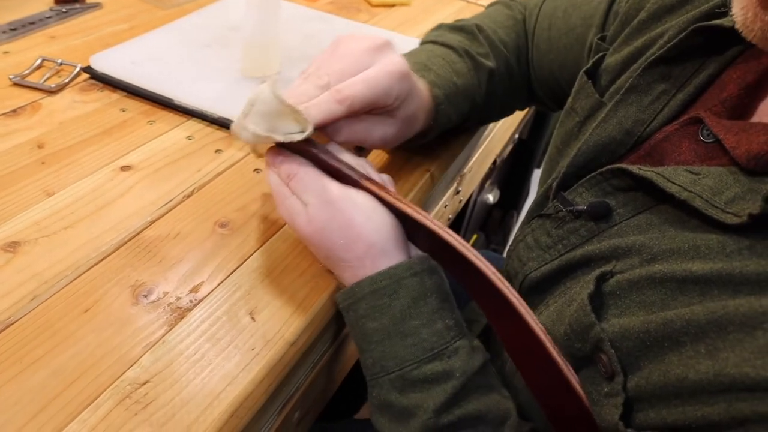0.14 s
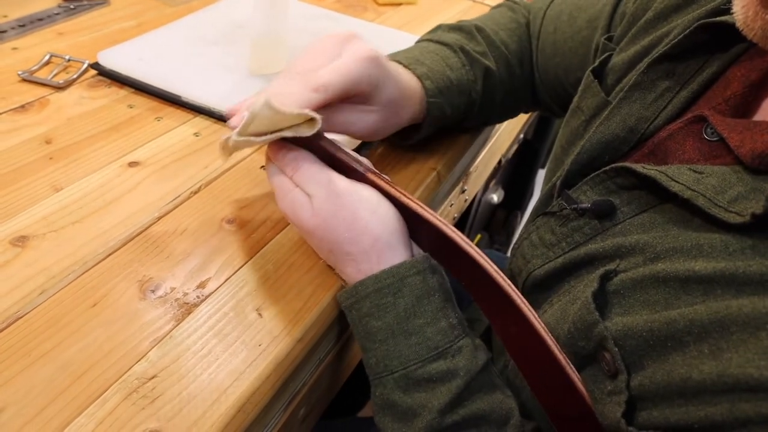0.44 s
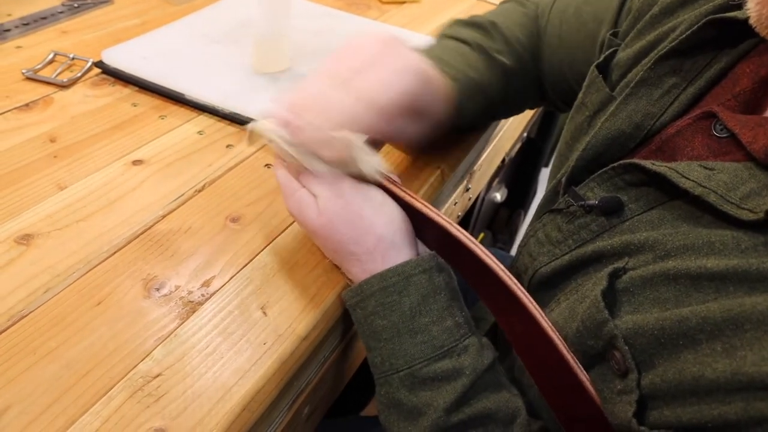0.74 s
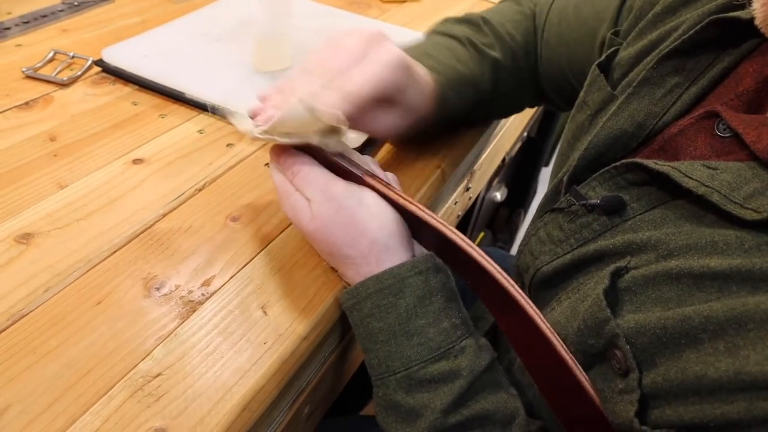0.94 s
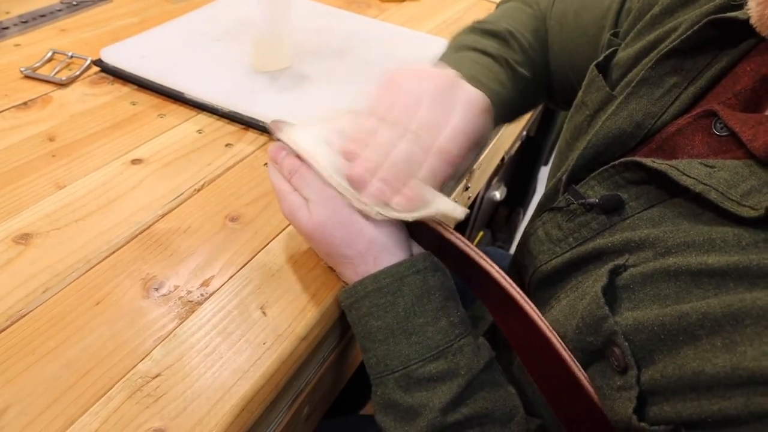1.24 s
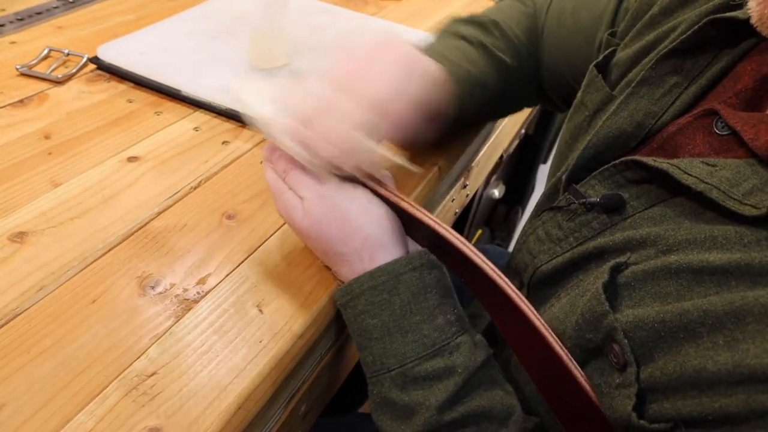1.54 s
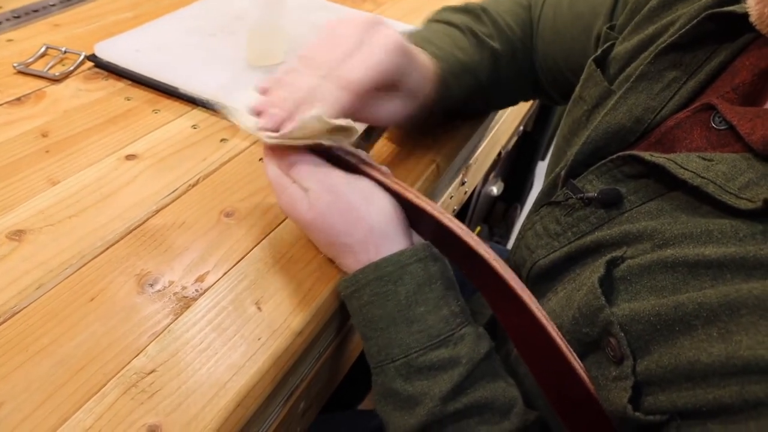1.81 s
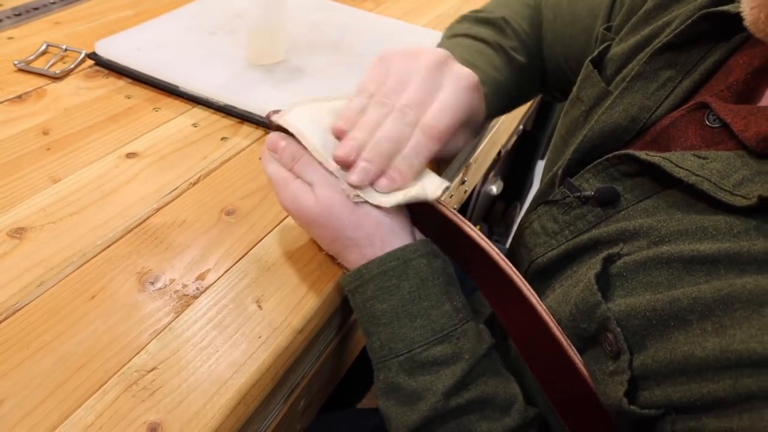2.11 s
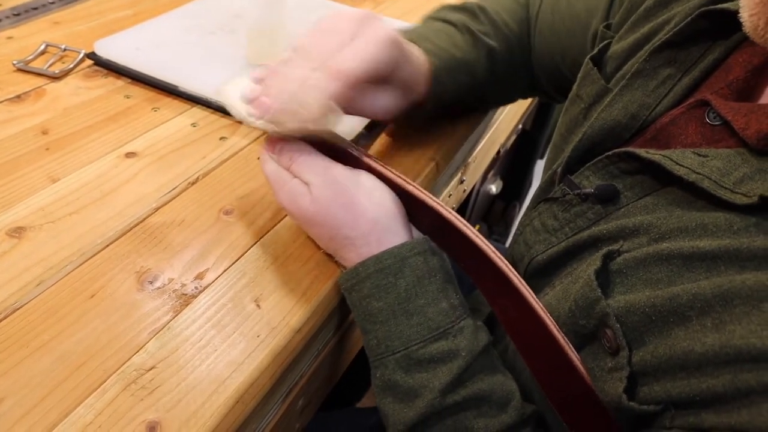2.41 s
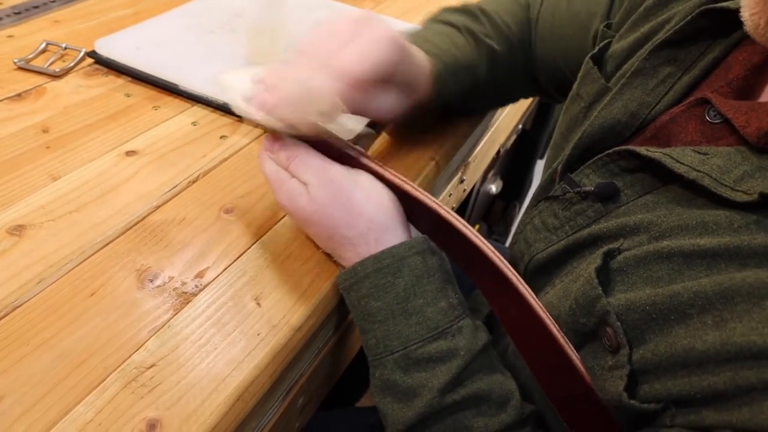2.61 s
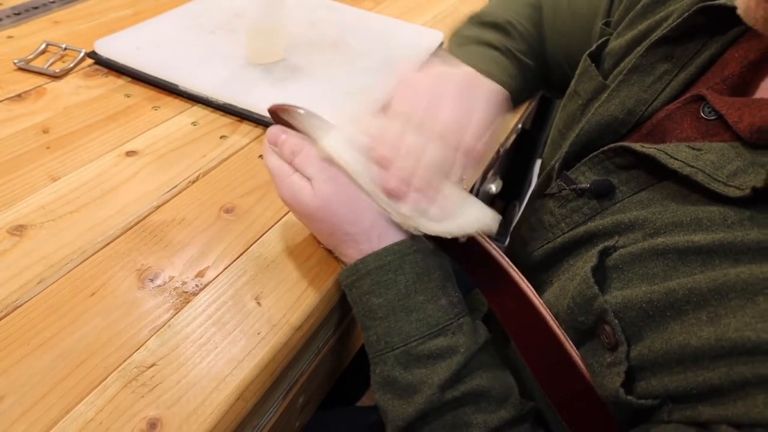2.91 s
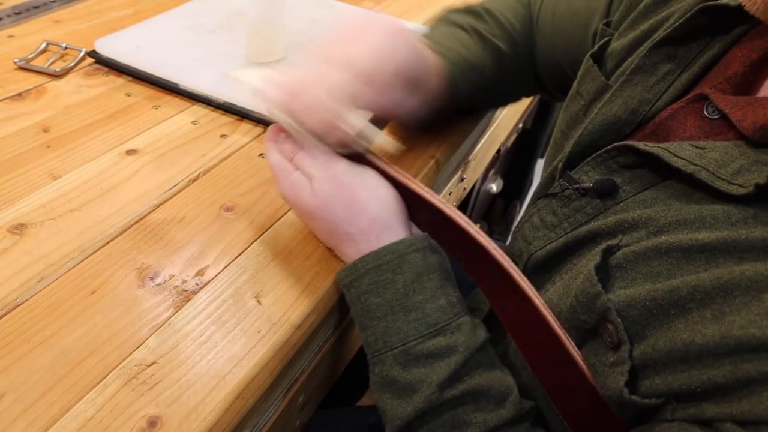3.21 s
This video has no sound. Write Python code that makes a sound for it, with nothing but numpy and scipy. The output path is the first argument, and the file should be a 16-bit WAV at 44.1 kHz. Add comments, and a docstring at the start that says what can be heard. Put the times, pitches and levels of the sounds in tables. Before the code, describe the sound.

A cloth rubs quickly back and forth along a leather strap edge, with one sharp early snap.

```python
"""A cloth is rubbed quickly to and fro along the edge of a leather strap at a wooden workbench.
Each stroke is shaped noise: hiss, rasp and dull drag where the press is hardest, and a rough weave note
that follows the hand's speed. A sharp snap (damped sines) follows two opening strokes; a faint one comes later.
Thuds are decaying sines; scuffs, catches, brushes, a squeak, a strap drone, rumble and sleeve rustle are noise.
All of it rings in a small workshop over a faint steady hiss."""
import sys
import numpy as np
from scipy import signal
from scipy.fft import rfft, irfft
from scipy.io import wavfile

SR = 44100
rng = np.random.default_rng(int(sys.argv[2]) if len(sys.argv) > 2 else 0)


def dump_mix(stems):
    """Bounce the given channels to the path in sys.argv[1] as a 16-bit WAV at rate SR."""
    frames = np.atleast_2d(stems).T  # one column per channel
    limited = np.clip(frames, -1, 1)  # hard clip at full scale
    pcm = np.round(limited * 32767).astype(np.int16)
    wavfile.write(sys.argv[1], SR, pcm)


N = 147735  # samples

# Strokes that bear down late. Each row: start in seconds, end in seconds, hiss level in dB, rasp level in dB,
# weave note level in dB, weave note near full speed in Hz.
PUSH_STROKES = [(-.06, 0.026, -25.5, -29.5, -37, 1400), (0.496, 0.612, -28.5, -29, -42, 1404),
                (0.761, .851, -25.5, -23.5, -32, 1300), (.991, 1.077, -24, -28.5, -33, 1350),
                (1.211, 1.294, -25, -34, -38, 1300), (1.429, 1.512, -25, -31.5, -35, 1400),
                (1.651, 1.727, -24, -33, -29, 1300), (1.857, 1.931, -25.7, -32, -35, 1000),
                (2.063, 2.142, -24.5, -30.5, -40, 1300), (2.277, 2.353, -23.5, -32.5, -34.5, 1250),
                (2.478, 2.560, -24, -27, -36, 1400), (2.683, 2.764, -24, -22.5, -27.5, 1450),
                (2.884, 2.964, -24, -19.5, -22, 1650), (3.089, 3.169, -24.5, -20.5, -25, 1549),
                (3.299, 3.385, -22, -23.5, -29.5, 1500)]
# Strokes that bear down early. Each row: the same columns as the pushes.
PULL_STROKES = [(.055, .078, -31.5, -35, -33, 1194), (.637, .734, -28, -28, -39, 1500),
                (.876, .967, -26, -24.5, -35.5, 1310), (1.103, 1.189, -26, -24.5, -33, 1250),
                (1.321, 1.406, -25.5, -25, -30, 1300), (1.540, 1.624, -26, -26, -30, 1300),
                (1.756, 1.834, -26.5, -25.5, -39, 1350), (1.958, 2.039, -26.5, -27, -37, 1300),
                (2.165, 2.248, -25.5, -27.5, -41, 1250), (2.377, 2.458, -26, -29, -38.5, 1300),
                (2.584, 2.663, -25.5, -25.5, -36, 1343), (2.788, 2.868, -25, -19.5, -29, 1458),
                (2.992, 3.072, -26, -15, -25.5, 1648), (3.190, 3.273, -24.5, -21.5, -28.5, 1606)]
# Shape of a stroke. The row: hardest press, press width, fastest point (all shares of the stroke),
# hiss change over the stroke in dB, loudest note with a light rasp, with a hard rasp (shares of the stroke).
PUSH_STROKE_SHAPE = (.68, .21, .52, .5, .64, 0.66)
PULL_STROKE_SHAPE = (0.27, 0.19, 0.31, -6, .52, 0.46)
# Spectrum of the rubbing hiss. Each row: frequency in Hz, relative level in dB.
HISS_SPECTRUM = [(150, -24), (500, -17), (900, -10.5), (1300, -4.5), (2200, -7.5), (3400, -3), (4200, -2.5),
                 (5400, 1.5), (6600, -2), (8000, -5), (10000, -10), (12500, -19), (16000, -25)]
# Spectrum of the rasp under hard fingers. Each row: frequency in Hz, relative level in dB.
RASP_SPECTRUM = [(150, -16.5), (500, -12.5), (900, -9), (1600, 0), (2200, -3.5), (2800, 2), (3500, 2.5),
                 (4200, -1.5), (5500, -2.5), (7500, -7.5), (10000, -8), (12500, -17.5), (16000, -32)]
# Spectrum of the dull drag. Each row: frequency in Hz, relative level in dB.
DRAG_SPECTRUM = [(40, -16), (130, -2.5), (300, -2), (800, -2.5), (1500, -2), (2400, -9), (16000, -53)]
# Drag level by stroke start. Each row: time in seconds, level in dB.
DRAG_LEVELS = [(.3, -42), (.65, -36), (1.5, -37), (2.0, -34.5), (2.6, -35.5), (3.1, -40.5)]
# The cloth bunches and scuffs. Each row: middle in seconds, half length in seconds, level in dB,
# pitch in Hz, glide in octaves per half length.
CLOTH_SCUFFS = [(0.069, 0.011, -34, 600, 0), (0.499, 0.012, -34.5, 750, .3),
                (0.654, 0.012, -36.5, 479.6, 0.29), (0.833, .012, -31.5, 758, -.5),
                (1.083, 0.023, -32.5, 742, -.5), (1.322, .015, -37, 520.5, 0.31),
                (1.917, 0.022, -29, 722, -0.246), (1.975, 0.022, -36.5, 420, -.3),
                (2.178, .012, -33.5, 649.4, .4), (2.32, 0.05, -34, 520, -0.38)]
# The cloth catches briefly on the edge. Each row: middle in seconds, half length in seconds, level in dB.
EDGE_CATCHES = [(.089, 0.0024, -35), (.322, 0.0027, -39), (0.322, 0.0031, -37.5), (.961, 0.0048, -27.5),
                (1.188, 0.0038, -26.5), (1.769, 0.0055, -23.5), (2.07, 0.0037, -32), (2.934, 0.0043, -18.5)]
# Light brushes as the cloth is laid on the edge. Each row: middle in seconds, half length in seconds, level in dB.
CLOTH_BRUSHES = [(.346, 0.029, -36), (.412, 0.016, -36), (.486, .018, -37.5)]
# Faint leather squeak. The row: middle in seconds, half length in seconds (sign has no effect), level in dB,
# pitch in Hz, bandwidth in Hz.
LEATHER_SQUEAK = (.747, -0.5, -43, 4022, 120)
# Drone of the taut strap. The row: middle in seconds, half length in seconds, level in dB, pitch in Hz,
# bandwidth in Hz.
STRAP_DRONE = (2, .33, -39.5, 108, 70)
# Soft blows of hand and strap on the bench. Each row: start in seconds, level in dB, ring in Hz, t60 in seconds.
BENCH_THUDS = [(.0548, -22, 220, 0.024), (.072, -27, 75, 0.047), (.072, -22, 225, 0.033),
               (.162, -30.5, 113, 0.25), (1.296, -17, 590, 0.029), (1.517, -26.5, 85, 0.07),
               (1.972, -23, 149, .08), (2.268, -28, 260, .04), (2.966, -24, 75.4, 0.15),
               (2.99, -16.5, 130, 0.047), (3.191, -29, 66, 0.093)]
# Spectrum of strap and bench rumble. Each row: frequency in Hz, relative level in dB.
RUMBLE_SPECTRUM = [(20, -25), (45, -6.5), (72, 0.5), (115, -4), (160, -4.5), (230, -4), (320, -6),
                   (500, -8.5), (800, -16.5), (1500, -23.5), (4000, -26.5), (16000, -53)]
# Rumble level over time. Each row: time in seconds, level in dB.
RUMBLE_LEVELS = [(0, -45), (.12, -44), (.24, -47.5), (.45, -41.5), (.85, -43.5), (1.6, -43), (1.95, -38.5),
                 (2.3, -39.5), (2.7, -39.5), (3.0, -43), (3.35, -39.5)]
# Spectrum of sleeve rustle. Each row: frequency in Hz, relative level in dB.
SLEEVE_SPECTRUM = [(100, -7), (600, -1), (1400, 1), (2500, -4.5), (5000, -4.5), (9000, -14.5), (12500, -22),
                   (16000, -25)]
# Sleeve level over time. Each row: time in seconds, level in dB.
SLEEVE_LEVELS = [(0, -40.5), (.13, -42), (.21, -52.5), (.29, -48), (.35, -38.5), (.45, -44), (1, -43.5),
                 (3.35, -41)]
# Snaps. Each row: start in seconds, level in dB.
SNAP_EVENTS = [(.1126, 0), (.756, -28)]
# Ringing modes of a snap. Each row: frequency in Hz, level in dB, t60 in seconds.
SNAP_RINGS = [(262, -23, 0.026), (1220, -15.5, .005), (2020, -7, 0.0049), (2800, -3, 0.0034),
              (3500, -4.5, 0.0038), (5700, -3, 0.0031), (7760, -1, 0.0029), (9030, -4.5, 0.0034),
              (10600, -7.5, 0.0035), (12100, -10, .002)]
# Snap reflections from bench and body. Each row: delay in seconds, level in dB.
SNAP_ECHOES = [(.0012, -25), (.0027, -16), (.0043, -24), (.0054, -16.5), (.0066, -23)]

OVERHANG_S, TRAIL_S, ATTACK_S, RELEASE_S = .005, .010, .013, .025
HISS_SPEED_POWER, GRIP_WANDER_DB = .12, 1.03
LIGHT_RASP_DB, HARD_RASP_DB = -24, -20
DRAG_SPREAD, NOTE_SPREAD = .38, .19  # shares of the stroke
NOTE_JITTER, NOTE_JITTER_HZ, NOTE_ROUGH_DB = .07, 320, 3.0  # jitter as a share of pitch, rms
NOTE_BEND, OCTAVE_DB = .6, -8
FIBRES_PER_S, FIBRE_SPREAD_DB, FIBRE_SHARE = 9000, 1.7, .33  # share of drive power
PATCH_DB, PATCH_HZ, PATCH_S = 2, 450, .016
FLEX_DB, FLEX_LAG_S, FLEX_WIDTH_S = -12, .022, .028  # level relative to the push's hiss
SCUFF_WIDTH_HZ = 560
ROOM_T60_S, ROOM_DB = .19, -19
STEADY_HISS_DB, EDGE_HZ = -56, 15950


def amp(db):
    """Decibels to gain."""
    return 10 ** (np.asarray(db) / 20)


def unit(x):
    """Scales to rms 1."""
    return x / np.sqrt(np.mean(x ** 2) + 1e-20)


def add(mix, start_s, sound):
    """Mixes a sound in at a time, trimming what falls outside."""
    at = round(start_s * SR)
    sound = sound[max(-at, 0):]
    part = mix[max(at, 0):][:len(sound)]
    part += sound[:len(part)]


def level_at(t, rows):
    """Gain read off a table of times and dB levels."""
    return amp(np.interp(t, *np.transpose(rows)))


def bump(t, width):
    """Gaussian swell around zero, down to 1/e at the width."""
    return np.exp(-(t / width) ** 2)


def colour(x, spectrum):
    """Filters a sound to a spectrum, at rms 1."""
    hz, db = np.transpose(spectrum)
    f = np.fft.rfftfreq(len(x), 1 / SR)
    gain = amp(np.interp(np.log(f + 1), np.log(hz), db))
    return unit(irfft(rfft(x) * gain, len(x)))


def wander(n, rate_hz):
    """Smooth random curve of rms 1, rolled off above a rate."""
    f = np.fft.rfftfreq(n, 1 / SR)
    lowpass = (f > 0) / (1 + (f / rate_hz) ** 4)
    return unit(irfft(rfft(rng.standard_normal(n)) * lowpass, n))


def fuzzy(hz, width_hz):
    """A narrow band of noise that follows a pitch curve."""
    n = len(hz)
    phase = 2 * np.pi * np.cumsum(hz) / SR
    in_phase = wander(n, width_hz / 2) * np.cos(phase)
    quadrature = wander(n, width_hz / 2) * np.sin(phase)
    return unit(in_phase + quadrature)


def friction(n, spectrum, rough_db, rough_hz):
    """Random fibre catches over smooth noise, with a rough level."""
    caught = rng.random(n) < FIBRES_PER_S / SR
    strength = amp(FIBRE_SPREAD_DB * np.minimum(rng.exponential(1, n), 4))
    fibres = unit(rng.standard_normal(n) * strength * caught)
    drive = np.sqrt(FIBRE_SHARE) * fibres + np.sqrt(1 - FIBRE_SHARE) * rng.standard_normal(n)
    return colour(drive * amp(rough_db * wander(n, rough_hz)), spectrum)


def room(x):
    """Workshop tail: decaying, dulled noise convolved with the sound."""
    t = np.arange(SR // 2) / SR
    decay = amp(-60 * t / ROOM_T60_S) * (t > .004)
    tail = unit(rng.standard_normal(len(t)) * decay) / np.sqrt(len(t))
    tail = signal.lfilter(*signal.butter(1, 7000, fs=SR), tail)
    return x + amp(ROOM_DB) * signal.fftconvolve(x, tail)[:N]


def steady_hiss():
    """Faint white noise at constant level."""
    return amp(STEADY_HISS_DB) * rng.standard_normal(N)


def rumble():
    """Strap and bench rumble: low noise made lumpy by a wandering level."""
    lumpy = rng.standard_normal(N) * amp(2.77 * wander(N, rate_hz=42))
    return colour(lumpy, RUMBLE_SPECTRUM) * level_at(np.arange(N) / SR, RUMBLE_LEVELS)


def sleeves():
    """Sleeve rustle: cloth friction at a slowly changing level."""
    rustle = friction(N, SLEEVE_SPECTRUM, rough_db=2.0, rough_hz=70)
    return rustle * level_at(np.arange(N) / SR, SLEEVE_LEVELS)


def strap_drone():
    """The taut strap drones: a low noise band that swells once."""
    middle_s, half_s, db, hz, width_hz = STRAP_DRONE
    swell = bump(np.arange(N) / SR - middle_s, half_s)
    return amp(db) * swell * fuzzy(np.full(N, hz), width_hz)


def thuds():
    """Soft blows: one damped sine each, with a softened onset."""
    out, t = np.zeros(N), np.arange(SR // 3) / SR
    onset = 1 - np.exp(-t / .00083)
    for start_s, db, hz, t60_s in BENCH_THUDS:
        add(out, start_s, amp(db - 60 * t / t60_s) * np.sin(2 * np.pi * hz * t) * onset)
    return out


def snaps():
    """Dry snaps: damped modes of alternating sign, then near echoes."""
    out, t = np.zeros(N), np.arange(2048) / SR
    ring = np.zeros(len(t))
    for k, (hz, db, t60_s) in enumerate(SNAP_RINGS):
        ring += (-1) ** k * amp(db - 60 * t / t60_s) * np.sin(2 * np.pi * hz * t)
    for start_s, db in SNAP_EVENTS:
        add(out, start_s, amp(db) * ring)
    direct = out.copy()
    for delay_s, db in SNAP_ECHOES:
        add(out, delay_s, amp(db) * direct)
    return out


def cloth_details():
    """Scuffs and squeak as narrow noise bands; catches and brushes as short bursts of rasp and hiss colour."""
    out, t = np.zeros(N), np.arange(-4096, 4096) / SR
    for middle_s, half_s, db, hz, glide in CLOTH_SCUFFS:
        pitch_hz = hz * 2 ** (glide * np.clip(t / half_s, -2, 2))
        add(out, middle_s + t[0], amp(db) * bump(t, half_s) * fuzzy(pitch_hz, SCUFF_WIDTH_HZ))
    middle_s, half_s, db, hz, width_hz = LEATHER_SQUEAK
    add(out, middle_s + t[0], amp(db) * bump(t, half_s) * fuzzy(np.full(len(t), hz), width_hz))
    for rows, spectrum in ((EDGE_CATCHES, RASP_SPECTRUM), (CLOTH_BRUSHES, HISS_SPECTRUM)):
        for middle_s, half_s, db in rows:
            burst = colour(rng.standard_normal(len(t)), spectrum)
            add(out, middle_s + t[0], amp(db) * bump(t, half_s) * burst)
    return out


def strap_flex():
    """The strap flexes just after each push: a soft swell of rumble."""
    out, t = np.zeros(N), np.arange(-4096, 4096) / SR
    for _, end_s, hiss_db, *_ in PUSH_STROKES:
        flex = colour(rng.standard_normal(len(t)), RUMBLE_SPECTRUM) * bump(t, FLEX_WIDTH_S)
        add(out, end_s + FLEX_LAG_S + t[0], amp(FLEX_DB + hiss_db) * flex)
    return out


def folds(x):
    """Shifting folds of cloth: blurred random gains over time and frequency."""
    hz, t, z = signal.stft(x, SR, nperseg=256)
    across = np.fft.fftfreq(len(hz), hz[1])[:, None]
    along = np.fft.fftfreq(len(t), t[1])
    blur = np.exp(-(across * PATCH_HZ * 2) ** 2 - (along * PATCH_S * 2) ** 2)
    patches = unit(np.fft.ifft2(np.fft.fft2(rng.standard_normal(z.shape)) * blur).real)
    _, patched = signal.istft(z * amp(PATCH_DB * patches), SR, nperseg=256)
    return unit(patched[:len(x)])


def weave(hz):
    """Threads catch one after another: a jittery, rough tone with its octave."""
    n = len(hz)
    jittered_hz = hz * (1 + NOTE_JITTER * wander(n, NOTE_JITTER_HZ))
    phase = 2 * np.pi * np.cumsum(jittered_hz) / SR
    tone = np.sin(phase) + amp(OCTAVE_DB) * np.sin(2 * phase)
    return unit(tone * amp(NOTE_ROUGH_DB * wander(n, NOTE_JITTER_HZ / 2)))


def stroke(row, shape):
    """One pass: hiss throughout, rasp and drag around the hardest press, a note that follows speed."""
    start_s, end_s, hiss_db, rasp_db, note_db, note_hz = row
    press_at, press_width, fastest_at, slope_db, light_at, hard_at = shape
    t = np.arange(8192) / SR
    n, length_s = len(t), end_s - start_s + OVERHANG_S + TRAIL_S
    u = np.clip(t / length_s, 0, 1)  # share of the stroke
    attack = np.sin(np.pi / 2 * np.clip(t / ATTACK_S, 0, 1)) ** 2
    release = np.sin(np.pi / 2 * np.clip((length_s - t) / RELEASE_S, 0, 1)) ** 2
    moving = attack * release

    travel = (t - OVERHANG_S) / (end_s - start_s + OVERHANG_S / 2)
    swing = np.interp(travel, [0, fastest_at, 1], [0, .5, 1])
    speed = np.abs(np.sin(np.pi * swing) + .02) ** NOTE_BEND

    hiss_level = amp(hiss_db + slope_db * (u - .5) + GRIP_WANDER_DB * wander(n, rate_hz=31))
    hiss = hiss_level * speed ** HISS_SPEED_POWER
    hiss = hiss * folds(friction(n, HISS_SPECTRUM, rough_db=.67, rough_hz=140))

    press = bump(u - press_at, press_width)
    rasp = amp(rasp_db) * press * folds(friction(n, RASP_SPECTRUM, rough_db=1.3, rough_hz=220))

    drag_level = level_at(start_s, DRAG_LEVELS) * bump(u - press_at, DRAG_SPREAD)
    drag = drag_level * friction(n, DRAG_SPECTRUM, rough_db=2.5, rough_hz=80)

    # a harder rasp moves the note's loudest point
    note_at = np.interp(rasp_db, [LIGHT_RASP_DB, HARD_RASP_DB], [light_at, hard_at])
    note_level = amp(note_db) / (1 + ((u - note_at) / NOTE_SPREAD) ** 2)
    note = weave(note_hz * speed) * note_level
    return start_s - OVERHANG_S, moving * (hiss + rasp + drag) + np.sqrt(moving) * note


def rubbing():
    """All pushes and pulls of the cloth along the strap edge."""
    out = np.zeros(N)
    for rows, shape in ((PUSH_STROKES, PUSH_STROKE_SHAPE), (PULL_STROKES, PULL_STROKE_SHAPE)):
        for row in rows:
            add(out, *stroke(row, shape))
    return out


def scene():
    """All sources in the workshop, over the steady hiss."""
    background = rumble() + sleeves() + strap_drone() + thuds()
    cloth = cloth_details() + strap_flex() + rubbing()
    return (room(background + snaps() + cloth) + steady_hiss())[None]


def record(dry):
    """Hard clip at full scale, then a linear-phase lowpass."""
    clipped = np.clip(dry, -1, 1)
    lowpass = signal.firwin(511, EDGE_HZ, window=("kaiser", 9), fs=SR)
    return signal.oaconvolve(clipped, lowpass[None], "same")


dry = scene()
out = record(dry)
dump_mix(out)
```